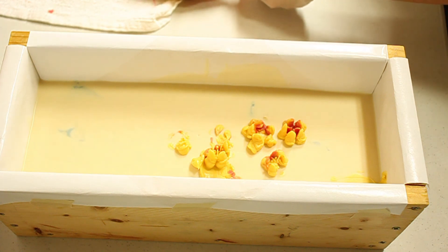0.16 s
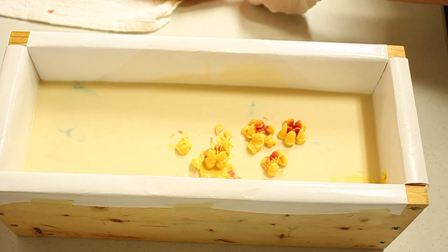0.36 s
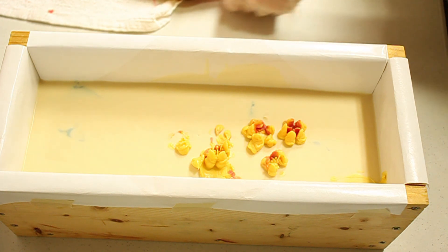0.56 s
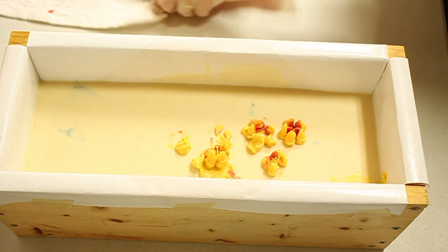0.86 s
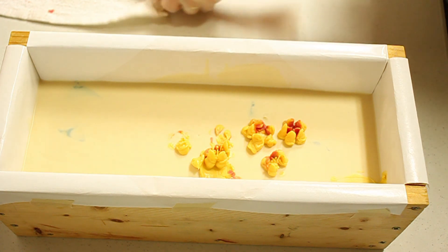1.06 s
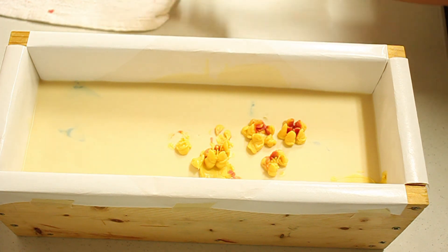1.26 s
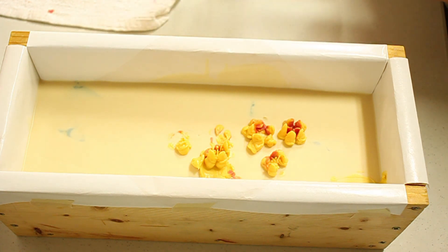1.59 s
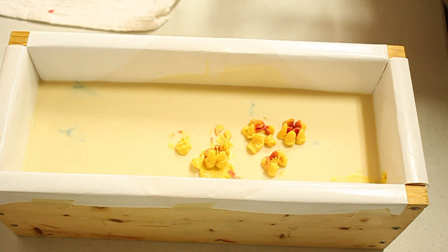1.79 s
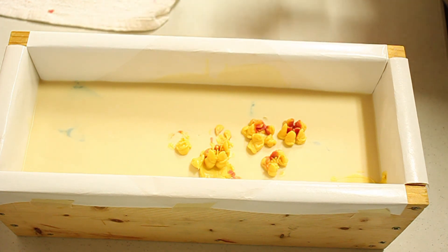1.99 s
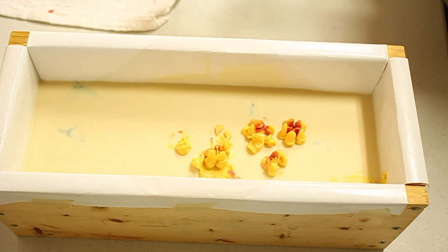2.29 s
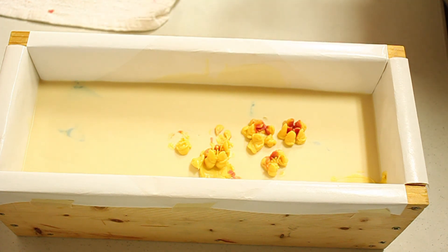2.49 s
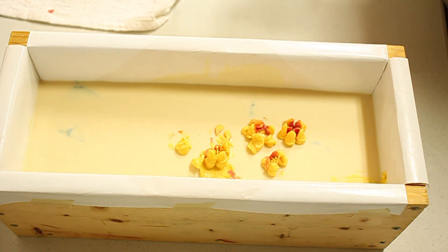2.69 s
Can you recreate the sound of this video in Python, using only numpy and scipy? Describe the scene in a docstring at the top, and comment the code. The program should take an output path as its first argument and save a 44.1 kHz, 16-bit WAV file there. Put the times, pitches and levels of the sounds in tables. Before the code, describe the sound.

A thin plastic piping bag rustles and crinkles in someone's hands, its folds letting go in sharp little snaps. Early on it knocks and drags on a wooden table, then squeaks faintly once. One microphone, small room, faint hiss.

```python
"""A thin plastic film rustles over a faint hiss: hands work a piping bag on a wooden table in a small room.
The sliding film rubs and crinkles, and its folds let go in single sharp snaps.
The bag knocks the table and drags over it in tiny slips, which makes the wood ring and murmur.
Just past the middle, film rubs on film in one short squeak. One microphone hears it all."""
import sys
import numpy as np
from scipy import signal
from scipy.fft import rfft, irfft, next_fast_len
from scipy.io import wavfile
from scipy.ndimage import uniform_filter1d, map_coordinates

SR = 44100
rng = np.random.default_rng(int(sys.argv[2]) if len(sys.argv) > 2 else 0)


def file_out(sig):
    """Save sig as 16-bit WAV at sys.argv[1]."""
    # one column per channel
    cols = np.atleast_2d(sig).T
    # limit, then scale
    lim = np.clip(cols, -1, 1)
    pcm = np.round(lim * 32767).astype(np.int16)
    wavfile.write(sys.argv[1], SR, pcm)


N = 125685


def amp(db):
    """Turn decibels into a number to multiply by."""
    return 10 ** (np.asarray(db) / 20)


def unit(x):
    """Scale a signal so that its average strength (rms) is 1."""
    return x / np.sqrt(np.mean(x ** 2) + 1e-20)


def along(points, hz):
    """Read between (Hz, value) points, with pitch spaced in octaves."""
    point_hz, values = np.transpose(points)
    return np.interp(np.log(hz + 1), np.log(point_hz + 1), values)


def curves(rows, t):
    """Read each column after the first (the time) at times t."""
    times, *columns = np.transpose(rows)
    return [np.interp(t, times, column) for column in columns]


def wobble(rate):
    """A smooth curve through `rate` random values a second."""
    return map_coordinates(rng.standard_normal(int(N * rate / SR) + 4), [np.arange(N) * rate / SR])


def filtered(x, response):
    """Scale and delay each frequency of x as response(Hz) says."""
    size = next_fast_len(len(x) + 8192)
    return irfft(rfft(x, size) * response(np.fft.rfftfreq(size, 1 / SR)), size)[:len(x)]


def hump(hz, centre_hz, octaves):
    """A bell-shaped curve that favours pitches near the centre."""
    return np.exp(-.5 * (np.log2((hz + 1) / centre_hz) / max(octaves, .1)) ** 2)


def resonances(rows):
    """A filter that rings. Each row: pitch in Hz, width in Hz, level in dB."""
    return lambda f: sum((-1) ** k * amp(db) * 1j * f * width / (hz * hz - f * f + 1j * f * width)
                         for k, (hz, width, db) in enumerate(rows))


def grains(per_s, spread_db):
    """Tiny ticks at random times, a few larger than the rest."""
    chance, side, size = rng.random((3, N))
    strength = amp(-spread_db * np.log(np.maximum(size, .03)))
    return unit((chance < per_s / SR) * np.sign(side - .5) * strength)


def add(track, start_s, x):
    """Mix x into the track at the given time."""
    i = round(start_s * SR)
    track[i:i + len(x)] += x[:len(track) - i]


def roomy(sound, room_db, tail_s=.4, gap_s=.002):
    """Follow a sound with the room's wash of echoes, each pitch dying at its own speed."""
    # Each row: pitch in Hz, seconds to fade by 60 dB.
    fade_times = [(200, 0.12), (1000, 0.18), (4000, 0.12), (12000, 0.14)]
    hz, t, noise = signal.stft(rng.standard_normal(int(tail_s * SR)), SR, nperseg=128)
    tail = signal.istft(noise * amp(-60 * t / along(fade_times, hz)[:, None]), SR, nperseg=128)[1]
    tail *= amp(room_db) * np.linalg.norm(sound) / np.linalg.norm(tail)
    tail = np.pad(tail, (round(gap_s * SR), 0))
    return tail + np.pad(sound, (0, len(tail) - len(sound)))


def hush():
    """Steady room and microphone hiss, with a faint low whirr and a thin high whine that waver."""
    # Each row: pitch in Hz, relative level of the hiss in dB.
    hiss_shape = [(12, -48), (20, -5), (116, -6.5), (233, -12.5), (335, -4.5), (397, -29), (456, 0),
                  (554, -12), (2000, -11), (2430, -12.5), (3600, -15.5), (5030, -16.5), (15800, -19)]
    # Each row: pitch of a band in Hz, width in Hz, relative level in dB.
    whirr = [(337, 133, 3.5), (529, 92, 2), (728, 70, 1.5)]
    whine = [(2420, 130, 0.33), (5170, 89, -1.8)]
    # Each row: time in seconds, level in dB.
    whirr_levels = [(0, -59), (.5, -68), (1.3, -63.5), (1.7, -66), (2.2, -69), (2.45, -56), (2.85, -63)]
    whine_levels = [(0, -68), (1.1, -74), (1.35, -59.5), (1.7, -69), (2.2, -79), (2.45, -59.5), (2.85, -70)]
    t = np.arange(N) / SR
    out = amp(-56.5) * unit(filtered(rng.standard_normal(N), lambda f: amp(along(hiss_shape, f))))
    for bands, levels, mid_hz in ((whirr, whirr_levels, 480), (whine, whine_levels, 3500)):
        level = amp(curves(levels, t)[0] + 2.5 * wobble(16))
        noise = filtered(rng.standard_normal(N), lambda f: resonances(bands)(f) * hump(f, mid_hz, 1.7))
        out += level * unit(noise)
    return out


def film_slide():
    """Sliding film rubs and crinkles: a hump of noise that moves in pitch, with an airy top."""
    # Each row: time in seconds, hump's relative level in dB, its pitch in Hz, top's relative level in dB.
    strokes = [(0.0, -58, 4270, -62), (0.16, -65, 4300, -84), (0.18, -64, 3300, -66),
               (0.27, -59, 3180, -63), (0.29, -48.5, 4070, -60), (0.34, -50, 4120, -67),
               (0.4, -53, 3500, -58), (0.45, -46, 4600, -51), (0.61, -46.5, 6760, -41.5),
               (0.65, -45, 6400, -48.5), (0.7, -51.5, 6460, -47), (0.75, -46.5, 4100, -46),
               (0.87, -53.5, 3380, -60), (0.91, -53.5, 5600, -75), (0.96, -53, 5700, -75),
               (1.0, -54.5, 3760, -60), (1.05, -58, 5160, -52.5), (1.19, -53.5, 5100, -67),
               (1.22, -53.5, 3580, -50), (1.28, -50, 4600, -55.5), (1.34, -58, 4560, -56),
               (1.37, -55, 3800, -60), (1.43, -55, 4350, -55), (1.62, -55.5, 5040, -63),
               (1.75, -65, 4100, -77), (1.82, -55, 5410, -53), (1.9, -61.5, 5300, -61),
               (1.98, -57.5, 3480, -54), (2.07, -41.5, 5500, -50.5), (2.11, -43, 5430, -43.5),
               (2.16, -53, 4100, -69), (2.2, -53, 3730, -53.5), (2.22, -53.5, 2900, -67),
               (2.4, -59.5, 2800, -63), (2.44, -52, 3400, -60), (2.47, -57, 3440, -63),
               (2.49, -60, 4480, -69), (2.64, -59, 4020, -83), (2.8, -68, 4430, -79),
               (2.85, -68, 3980, -77)]
    # Each row: pitch in Hz, relative level of the airy top in dB.
    air_shape = [(2000, -58), (6000, 0), (9000, -6.5), (13000, -1.5), (16000, -8.5)]
    rustle = rng.standard_normal((2, N)) + amp(-14.5) * grains(per_s=500, spread_db=7)
    hz, t, (body_noise, air_noise) = signal.stft(rustle / np.std(rustle), SR, nperseg=256)
    hump_db, hump_hz, air_db = curves(strokes, t)
    f = hz[:, None]
    wide = np.where(f > hump_hz, hump(f, hump_hz, octaves=.85), hump(f, hump_hz, octaves=1.82))
    core = .55 * hump(f, hump_hz, octaves=.15)
    body, air = (shape / np.sqrt(np.mean(shape ** 2, 0)) * amp(db - 1)
                 for shape, db in ((wide + core, hump_db), (amp(along(air_shape, f)), air_db)))
    # Small patches of pitch swell and fade, and the whole rustle flickers.
    patches = uniform_filter1d(uniform_filter1d(rng.standard_normal(body_noise.shape), 5, 0), 8, 1)
    flicker_db = 1.4 * wobble(39.5)[np.minimum((t * SR).astype(int), N - 1)]
    spectrum = (body_noise * body + air_noise * air) * amp(1.6 * unit(patches) + flicker_db)
    return signal.istft(spectrum, SR, nperseg=256)[1][:N]


def film_snaps():
    """Each fold of film lets go in a short burst, echoed by the table and the room."""
    # Each row: start in seconds, relative level in dB, low and high edges in Hz,
    # airy top in dB, ringing pitch in Hz, strength of that ring in dB.
    folds = [(0.2322, -16, 875, 5100, -52, 3120, -4.5), (0.3167, -20, 1100, 5040, -16, 4200, 10),
             (0.7626, -27.5, 1200, 4040, -13, 1290, 0), (0.933, -24, 1450, 8600, 5, 6450, -1),
             (1.1613, -37.5, 1370, 2240, -32, 1750, 19), (1.2173, -56, 990, 3500, -22, 1250, 5),
             (1.958, -38.5, 2300, 7000, -24, 4500, -3), (1.9679, -35.5, 2300, 6960, -24, 4470, 5),
             (1.9842, -27.5, 1900, 5570, -18, 3020, -1), (2.0294, -32, 3220, 6500, -24, 4260, 14),
             (2.177, -37, 2020, 6000, -13, 2500, 0), (2.2553, -21.5, 1740, 4400, -12, 2640, 19.5),
             (2.3472, -34.5, 1060, 3680, -31, 2660, -5), (2.393, -37.5, 1780, 3430, -23, 2570, 6),
             (2.5336, -14.5, 1280, 6760, -10, 2280, -1.5)]
    soft_db, crisp_db = -42, -20  # weak snaps are soft puffs, strong ones lead with a sharp edge
    crisp_fade_s, echo_s, top_hz = .0016, .001, 12300
    out, t = np.zeros(N), np.arange(1024) / SR
    lows = lambda ratio: 1 / (1 - ratio * ratio + 1.4j * ratio)  # passes pitches below an edge
    highs = lambda ratio: -ratio * ratio * lows(ratio)  # passes pitches above it
    for start_s, db, low_hz, high_hz, air_db, ring_hz, ring_db in folds:
        crisp = np.clip((db - soft_db) / (crisp_db - soft_db), 0, 1)
        fade_s = crisp_fade_s * 3.5 ** (1 - crisp)
        burst = .35 * np.exp(-t / fade_s) * rng.standard_normal(len(t))
        burst[[0, round(echo_s * SR)]] = -crisp * amp([0, -6])  # the edge and its echo off the table
        ring = resonances([(ring_hz, ring_hz / 6, ring_db)])
        top = lambda f: lows(f / high_hz) ** 2 + amp(air_db) * highs(f / high_hz) ** 2 * lows(f / top_hz)
        tone = lambda f: highs(f / low_hz) ** 2 * top(f) * (1 + ring(f))
        snap = filtered(roomy(burst, room_db=-2), tone)
        add(out, start_s, amp(db - 10) * snap / np.sqrt(np.mean(snap[:SR // 200] ** 2)))
    return out


def table_top(centre_hz, octaves):
    """A filter that rings at the wooden table's own notes, favouring those near the centre."""
    # Each row: pitch in Hz, relative level in dB, seconds to fade by 60 dB.
    notes = [(97.4, 9, 0.093), (147.5, 8, 0.11), (189.8, 4.5, 0.14), (278.6, 6, 0.071), (357, 5, 0.12),
             (487, -0.5, 0.14), (531, -5, 0.16), (596, 6, 0.096), (677, -45, 0.21), (887, -3.5, 0.14),
             (949, -8.5, 0.17), (1184, 5.5, 0.12), (1311, 11, 0.046), (1920, -21, .1)]
    return resonances([(hz, 1.76 / fade_s, db + 20 * np.log10(hump(hz, centre_hz, octaves) * fade_s + 1e-9))
                       for hz, db, fade_s in notes])


def table_knocks():
    """The bag's blow and its rough settling ring some of the table's notes over a dull thud."""
    # Each row: start in seconds, relative level in dB, favoured pitch in Hz,
    # spread in octaves, contact time in seconds.
    blows = [(0.233, -46.5, 150, 1.1, 0.0024), (.302, -34.5, 347, 0.27, 0.0085),
             (.314, -37, 95, 0.41, 0.0054), (.316, -23.5, 780, 0.63, 0.028), (0.421, -41, 1300, 0.15, .008),
             (.745, -36, 365, 0.49, 0.0018), (.991, -53.5, 370, 0.36, 0.0045),
             (1.066, -35.5, 184, 0.14, 0.0047), (1.068, -43.5, 610, 0.45, 0.015),
             (1.218, -35, 1150, 0.38, 0.012), (1.219, -40, 320, 1, .006), (1.982, -52, 620, 0.4, 0.0028),
             (2.190, -53.5, 750, 0.39, 0.0046), (2.254, -40, 835, 0.29, 0.0027),
             (2.535, -43.5, 540, .6, 0.0034)]
    out, t = np.zeros(N), np.arange(SR // 5) / SR
    for start_s, db, hz, octaves, contact_s in blows:
        push = np.exp(-t / contact_s) * rng.standard_normal(len(t))
        push[0] = .43 * np.linalg.norm(push)  # the first hit
        wood = table_top(hz, octaves)
        thud = resonances([(hz, 2.13 * hz * octaves, -13)])
        soften = lambda f: 1 / (1 + 1j * f / (3 * hz))
        knock = filtered(roomy(push, room_db=-13), lambda f: (wood(f) + thud(f) ** 2) * soften(f))
        add(out, start_s, amp(db - 6.5) * knock / np.sqrt(np.mean(knock[:SR // 25] ** 2)))
    return out


def bag_drag():
    """Uneven slips of the heavy bag keep the table murmuring; gentle ones stir its deep notes."""
    # Each row: time in seconds, level in dB, share of the deep notes from 0 to 1.
    pulls = [(.30, -55, 0.2), (.325, -32, 0.2), (.44, -42, 0.06), (.47, -49, 0.8), (.53, -51, 0.48),
             (.555, -45, 0.23), (.60, -53, 0.3), (.69, -50.5, 0.42), (.745, -38, 0.24), (.785, -31, 0.16),
             (.83, -45, 0.36), (.90, -60, 0.1), (.97, -61.5, .5), (1.0, -53, 0.7), (1.04, -66, 0.5),
             (1.2, -77, .5), (1.25, -47.5, 0.05), (1.4, -73, .3)]
    t = np.arange(N) / SR
    level_db, deep_share = curves(pulls, t)
    mid_notes, deep_notes = table_top(642, octaves=.87), table_top(200, octaves=.97)
    scrape = lambda f: mid_notes(f) + .037 * hump(f, 705, octaves=1.16)
    slips = grains(per_s=900, spread_db=2)
    moving = (t > pulls[0][0]) & (t < pulls[-1][0])
    force = amp(level_db) * moving * slips
    return sum(filtered(share * force, ring) / np.std(filtered(slips, ring))
               for share, ring in ((1 - deep_share, scrape), (deep_share, deep_notes)))


def film_squeak():
    """Film rubs on film in one thin, falling squeak."""
    start_s, length_s, start_hz, fall_hz, peak_db = 1.587, .065, 5500, 750, -51.5
    out, t = np.zeros(N), np.arange(int(length_s * SR)) / SR
    hz = start_hz - fall_hz * t / length_s + 90 * wobble(410)[:len(t)]
    swell = amp(peak_db) * np.sin(np.pi * np.sqrt(t / length_s))
    add(out, start_s, swell * np.sin(2 * np.pi * np.cumsum(hz) / SR))
    return out


def scene():
    """All the sounds together, the same on the left and the right."""
    mono = film_snaps() + table_knocks() + bag_drag() + film_slide() + film_squeak() + hush()
    return np.array([mono, mono])


def record(dry):
    """Everything above 15.9 kHz is cut away, trimming the very top of the hiss."""
    top_hz = 15900
    return np.array([filtered(channel, lambda hz: hz < top_hz) for channel in dry])


dry = scene()
out = record(dry)
file_out(out)
```